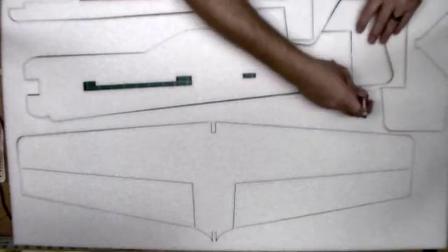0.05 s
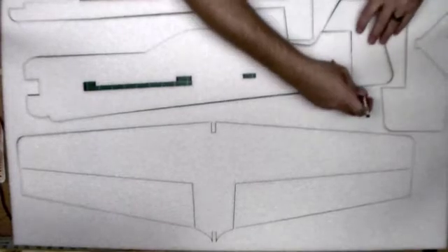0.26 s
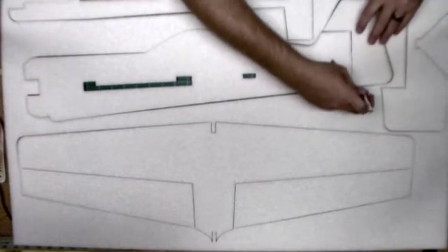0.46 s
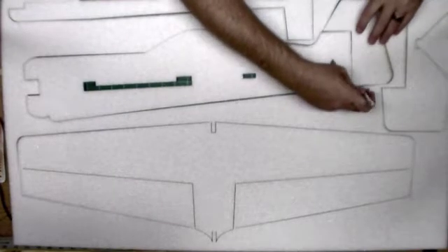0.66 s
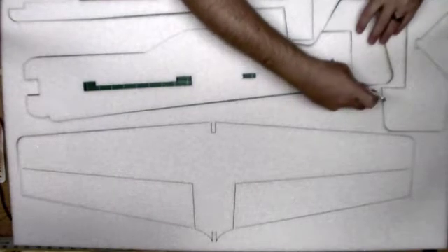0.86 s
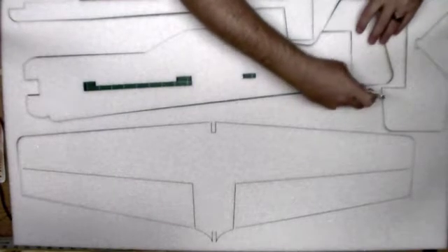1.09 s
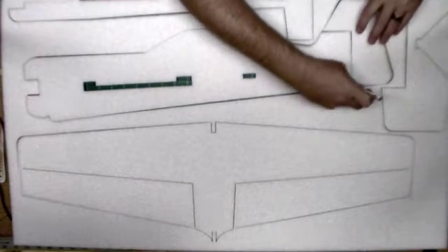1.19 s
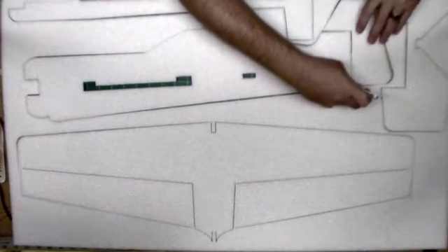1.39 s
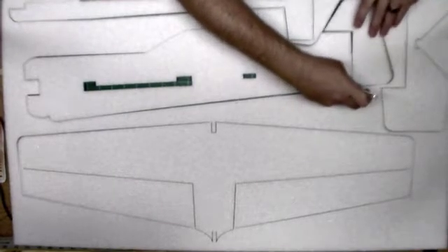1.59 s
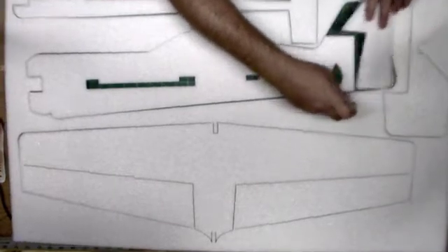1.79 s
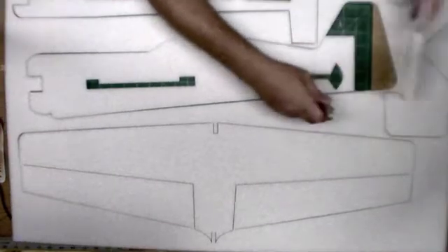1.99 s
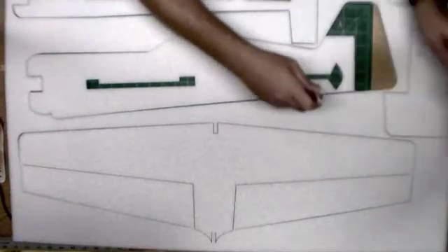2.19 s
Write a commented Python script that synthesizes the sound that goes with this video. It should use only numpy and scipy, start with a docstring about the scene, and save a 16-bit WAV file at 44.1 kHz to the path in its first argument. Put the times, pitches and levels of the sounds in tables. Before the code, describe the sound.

Foam being cut and pulled apart close to the microphone on a worktable. Short scratchy strokes and brittle ticks start near 0.2 s, with the loudest snap at 0.42 s and a crackle of clicks around 0.7-0.85 s. Fainter scratches follow until 1.45 s. A rough scrape with bunched snaps runs 1.5-1.9 s, then soft airy slides to 2.25 s. Steady hiss and faint fan hum in a small, dry room.

```python
"""Microphone hiss, room rumble and a faint fan (filtered noise) run throughout; foam squeaks are swelling sines.
A hobby knife works through a foam sheet on a worktable: short scratchy strokes of grainy noise, with snaps
as foam tabs break (ringing bursts that knock the sheet's modes). Then a cut piece is pulled free with a long
scrape, more snaps, and is slid aside. The small microphone housing rings near 3.4 kHz after snaps and knife."""
import sys
import numpy as np
from scipy import signal
from scipy.fft import rfft, irfft, next_fast_len
from scipy.io import wavfile

SR = 44100
rng = np.random.default_rng(int(sys.argv[2]) if len(sys.argv) > 2 else 0)


def to_wav(sig):
    """Store sig (one row per channel, or 1-D mono) as 16-bit WAV at the path in sys.argv[1].

    Samples outside -1..1 are clipped; the rate is SR.
    """
    pcm = np.clip(np.atleast_2d(sig), -1, 1) * 32767
    pcm = np.round(pcm).astype(np.int16)
    wavfile.write(sys.argv[1], SR, pcm.T)  # frames by channels


N = 99225

# foam tabs snap: start_s, peak_db, pitch_hz, treble_db (rustle re peak), bass_db (sheet knock re peak)
SNAPS = [(0.18, -33.5, 3270, -11.5, -43), (0.1904, -42, 3460, -27, -31), (0.1935, -39, 3490, -7, -22),
         (0.2033, -26.5, 3415, -14, -34), (0.2123, -53.5, 3700, 5, -17), (0.2174, -45, 3320, -16, -30),
         (0.3231, -48, 1950, -14, -23), (0.417, -14, 3416, -24, -14.5), (0.4209, -31, 3300, -10, -23),
         (0.4279, -37, 3660, -27, -11), (0.4444, -38, 3170, -22, -13), (0.4617, -49, 3350, -22, -4),
         (0.5422, -42.5, 3360, -26, -30), (0.5507, -41, 3240, -30, -18.5), (0.6831, -40, 3760, -10.5, -24),
         (0.7076, -35.5, 3370, -34, -32), (0.7159, -34, 3540, -27, -37), (0.7279, -37, 3030, -22, -21),
         (0.7355, -28.5, 3500, -33, -27.5), (0.7435, -47, 3270, -20, -20), (0.7565, -50, 3600, -14, -20),
         (0.77, -25.5, 3540, -16.5, -26), (0.7905, -55, 3650, -18, -26), (0.7974, -49, 3330, -18, -24),
         (0.8077, -44, 3460, -21, -25), (0.836, -45, 3480, -16, -31), (0.947, -43.5, 3340, -15, -14),
         (0.9725, -46, 3470, -2, -12.5), (1.1017, -53, 3870, -4, -13), (1.5422, -38, 3360, -16, -36),
         (1.5575, -25, 3370, -15, -14.5), (1.5692, -33, 3760, -23, -29), (1.5767, -39.5, 3060, -15, -10),
         (1.619, -29.5, 2870, -23, -17.5), (1.6206, -23.5, 3170, -33, -32), (1.7392, -31, 3120, -13, -35),
         (1.7563, -21.5, 2600, -24, -37), (1.7634, -36, 2420, -15, -11), (1.7683, -30, 3470, -21, -9),
         (1.8192, -29.5, 3980, -13, -15), (1.8284, -27, 2830, -16, -15)]
HOUSING_HZ = 3420


def amp(db):
    """Decibels to amplitude."""
    return 10 ** (np.asarray(db) / 20)


def rms_one(x):
    """Scale to rms 1."""
    return x / np.sqrt(np.mean(x ** 2) + 1e-30)


def at_hz(points, hz):
    """Read a (frequency, value) curve on a log frequency axis."""
    points_hz, values = np.array(points).T
    return np.interp(np.log(hz), np.log(points_hz), values)


def drift(rate_hz):
    """Slow chance of rms 1: noise through a two-pole low-pass."""
    warmup = 9000
    r = np.exp(-2 * np.pi * rate_hz / SR)
    slow = signal.lfilter([1], [1, -2 * r, r * r], rng.standard_normal(N + warmup))
    return rms_one(slow[warmup:])


def ring(clicks, hz, t60_s):
    """Two-pole resonator: a unit click starts a decaying sine of height 1."""
    r, w = amp(-60 / (t60_s * SR)), 2 * np.pi * hz / SR
    return signal.lfilter([0, np.sin(w)], [1, -2 * r * np.cos(w), r * r], clicks + 1e-18)


def colour(sources, envelopes, spectrum, likeness):
    """Third-octave stereo bands in five zones (thud, bass, low middle, upper middle, treble).

    Each zone has rms 1 before its envelope; without envelopes the sum has rms 1."""
    # zone limits: edge_hz
    zone_edges_hz = [250, 800, 2000, 4800]
    edges_hz = 25 * 2 ** np.arange(0, 9.5, 1 / 3)
    zones = np.zeros((5, 2, N))
    for k, (low_hz, high_hz) in enumerate(zip(edges_hz, edges_hz[1:])):
        hz = np.sqrt(low_hz * high_hz)
        zone = np.searchsorted(zone_edges_hz, hz)
        band = signal.butter(2, [low_hz, high_hz], "band", fs=SR, output="sos")
        # second source feeds the treble; neighbouring bands use separate noise
        mid, side = signal.sosfilt(band, sources[zone // 4][k % 2])
        alike = np.clip(at_hz(likeness, hz), -1, 1)
        stereo = np.sqrt(1 + alike) * mid + np.sqrt(1 - alike) * side * [[1], [-1]]
        zones[zone] += amp(at_hz(spectrum, hz)) * stereo
    if envelopes is None:
        return rms_one(zones.sum(axis=0))
    return sum(e * rms_one(z) for e, z in zip(envelopes, zones))


def background():
    """Microphone hiss and room rumble, with narrow noisy tones of a fan and electronics."""
    floor_db = -64.5
    # noise floor spectrum: hz, relative density_db_per_hz
    floor_spectrum = [(25, -34), (60, -17), (125, -11), (260, -22.5), (380, -8.5), (520, -11), (720, -16),
                      (1100, -16), (2000, -16.5), (3300, -18.5), (5000, -22), (11000, -22), (16000, -23.5)]
    # floor stereo: hz, left-right likeness (-1..1)
    floor_likeness = [(60, 0.6), (240, 0.96), (950, 0.0035), (3770, 0.12), (15000, 0.16)]
    # fan and electronics: pitch_hz, width_hz (about 6 dB down), level_db
    fan_tones = [(125, 55, -77), (366.5, 38, -74.5), (425, 29, -80.5), (500.4, 30, -71), (1648, 32, -81),
                 (15734, 33, -92)]
    noise = rng.standard_normal((2, 2, N))
    out = amp(floor_db) * colour([noise, noise], None, floor_spectrum, floor_likeness)
    for hz, width_hz, db in fan_tones:
        mid, side = ring(rng.standard_normal((2, N)), hz, 4.1 / width_hz)
        out += amp(db) * rms_one(mid + 0.71 * side * [[1], [-1]])
    return out


def squeaks():
    """Faint squeaks of foam on foam: short swelling sines."""
    # squeaks: start_s, length_s, pitch_hz, peak_db
    squeak_table = [(0.054, 0.023, 2460, -61.5), (0.995, 0.023, 2450, -58), (1.142, 0.014, 1900, -62),
                    (1.96, .01, 5250, -45.5)]
    t = np.arange(N) / SR
    out = np.zeros(N)
    for start_s, length_s, hz, db in squeak_table:
        swell = np.sin(np.pi * np.clip((t - start_s) / length_s, 0, 1)) ** 2
        out += amp(db) * swell * np.sin(2 * np.pi * hz * t)
    return out


def rubbing(envelopes, spectrum, rough):
    """Foam beads tear in dense clumped grains on top of friction noise, which is smoother in the treble."""
    grains_per_s, grain_spread_db, clump_db = 2500, 4, 0.5
    grain_share, treble_grain_share = 0.45, 0.28  # at rough = 1
    # contact stereo: hz, left-right likeness (-1..1)
    contact_likeness = [(60, 0.66), (300, 0.87), (3500, 0.99), (4600, -0.14), (6000, -0.16), (15000, -0.61)]
    born = rng.random(N) < grains_per_s * amp(6 * drift(40)) / SR
    size = born * amp(grain_spread_db * np.minimum(rng.exponential(1, N), 4))
    grain = rms_one(signal.lfilter([1], [1, -.8], size))
    clump = amp(rough * clump_db * drift(90))
    white = rng.standard_normal((2, 2, N))
    shares = np.clip([rough * grain_share, rough * treble_grain_share], 0, 1)
    sources = [np.sqrt(1 - g + g * grain ** 2) * clump * white for g in shares]
    return colour(sources, envelopes, spectrum, contact_likeness)


def stroke_contact(strokes):
    """Strength by zone of strokes that rise from -20 dB, hold and fall back."""
    # against a stroke's bass level: thud_db, bass_db, low_middle_db
    low_zones_db = [-10.5, -5, -2]
    t, power = np.arange(N) / SR, np.zeros((5, N))
    for start_s, attack_s, hold_s, release_s, db, treble_db, bass_db in strokes:
        corners_s = np.cumsum([start_s, attack_s, hold_s, release_s])
        shape_db = np.interp(t, corners_s, [-20, 0, 0, -20], left=-99, right=-99)
        zone_db = np.r_[bass_db + np.array(low_zones_db), 0, treble_db]
        power += amp(2 * (db + shape_db + zone_db[:, None]))
    return np.sqrt(power)


def rustle_contact():
    """Strength by zone of the rustle after each snap: upper middle and treble die exponentially."""
    tail_s, tail_db = .005, -17  # decay time constant, level re snap peak
    treble_tail_s, treble_gain_db = 0.0025, 4.5
    t, power = np.arange(N) / SR, np.zeros((5, N))
    for start_s, db, _, treble_db, _ in SNAPS:
        begun, after_s = t > start_s, np.maximum(t - start_s, 0)
        power[3] += begun * amp(2 * (db + tail_db)) * np.exp(-2 * after_s / tail_s)
        power[4] += begun * amp(2 * (db + treble_db + treble_gain_db)) * np.exp(-2 * after_s / treble_tail_s)
    return np.sqrt(power)


def knife():
    """Knife and finger strokes and the rustle after snaps, ringing on at the housing resonance."""
    stroke_rough, rustle_rough = 1.0, 0.13  # share of full graininess
    ring_db, ring_t60_s = -19, .008
    # strokes: start_s, attack_s, hold_s, release_s, level_db, treble_db, bass_db (both re level)
    stroke_table = [(0.155, 0.022, 0.026, 0.076, -54.5, 3, -8),
                    (.295, 0.012, 0.029, 0.023, -62.5, -0.5, -13),
                    (0.388, 0.017, 0.031, 0.086, -47, -2.5, -3.5),
                    (0.523, 0.015, 0.027, 0.039, -59, -2.5, -3.5),
                    (0.663, 0.035, 0.086, 0.013, -57.5, 1, -4.5),
                    (0.774, 0.0046, 0.072, 0.02, -59.5, -2, -4.5), (0.929, 0.021, 0.01, 0.11, -55.5, 3, -6),
                    (1.087, 0.023, 0.046, 0.084, -60.5, 2.5, -7.5),
                    (1.225, 0.032, 0.043, 0.096, -65, 4.5, -4.5),
                    (1.336, .05, 0.042, 0.064, -61.5, 2, -4.5)]
    # cutting spectrum: hz, relative density_db_per_hz
    cut_spectrum = [(29, -54), (50, -13.5), (258, -23.5), (450, -7), (615, -11.5), (1330, -18.5),
                    (1910, -14.5), (2210, -13), (3410, -7), (4450, -13), (7760, -15), (10400, -15),
                    (16000, -24)]
    cutting = rubbing(stroke_contact(stroke_table), cut_spectrum, stroke_rough)
    rustle = rubbing(rustle_contact(), cut_spectrum, rustle_rough)
    contact = cutting + rustle
    return contact + amp(ring_db) * ring(np.diff(contact, prepend=0), HOUSING_HZ, ring_t60_s)


def snaps():
    """Each break is a burst ringing at its own pitch and in the housing; it knocks the modes of the sheet."""
    burst_s, snap_t60_s = .00035, .0015
    housing_db, housing_t60_s = -4, 0.0017
    sheet_db, sheet_lag_s = -3, 0.00076
    # modes of the sheet: pitch_hz, relative level_db, t60_s
    sheet_modes = [(130, -12, 0.063), (379, -1.5, .12), (539, 2.5, 0.029), (632, -0.5, 0.037),
                   (736, -2, 0.03), (1053, -5.5, 0.072), (1247, -3, 0.033), (1469, -1, 0.059),
                   (1922, -0.5, 0.033), (2420, -28, 0.0067)]
    out, size = np.zeros(N + SR), 2048
    chance = rng.standard_normal((len(SNAPS), 200))
    samples = np.arange(size)
    u = samples / (burst_s * SR)
    for (start_s, db, hz, _, _), draw in zip(SNAPS, chance):
        push = u ** 2 * np.exp(-u) * np.sin(2 * np.pi * hz * samples / SR)
        push[:150] *= 1 + 0.18 * draw[:150]
        tone = rms_one(ring(push, hz, snap_t60_s))
        tone = tone + amp(housing_db) * rms_one(ring(tone, HOUSING_HZ, housing_t60_s))
        first = int(start_s * SR)
        out[first:first + size] += amp(db) * tone / np.abs(tone).max()
    start_s, peak_db, _, _, bass_db = np.transpose(SNAPS)
    at = (start_s * SR + sheet_lag_s * SR).astype(int)
    for k, (hz, mode_db, t60_s) in enumerate(sheet_modes):
        clicks = np.zeros(N + SR)
        clicks[at] = amp(peak_db + bass_db + sheet_db + mode_db + 2 * chance[:, 150 + k])
        out += ring(clicks, hz, t60_s) * (-1) ** k  # alternate mode signs
    return out[:N]


def pull():
    """The piece is pulled free: one long scrape whose zones follow drawn level curves."""
    # pull: time_s, level_db, thud_db, bass_db, low_middle_db, treble_db (last four re level)
    pull_curve = [(1.48, -72, -20, -25, -12, 4.5), (1.52, -52, -33, -20, -14.5, -6),
                  (1.551, -40.5, -30, -17, -10, -6), (1.575, -38.5, -25, -20, -17, -4),
                  (1.6, -42.5, -22, -13, -19, -2.5), (1.63, -43.5, -28, -19, -11, -2),
                  (1.65, -45, -21, -18, -17, -1), (1.68, -40, -24.5, -14.5, -8, -1),
                  (1.71, -41.5, -28, -12, -9, -1), (1.735, -39.5, -24, -14.5, -5, -1),
                  (1.755, -36, -35, -15, -4, -0.5), (1.771, -33.5, -29, -15.5, -17, -5),
                  (1.785, -44, -22, -8, -7, 2.5), (1.805, -42.5, -20, -17, -11, -1),
                  (1.821, -36.5, -19, -15, -19, 0), (1.836, -42.5, -9.5, -1, -17, 1),
                  (1.85, -43.5, -18, -10, -7, 2), (1.875, -53, -16, -4, -6, 2),
                  (1.931, -77.5, -22, -3, -7, 8)]
    # pull spectrum: hz, relative density_db_per_hz
    rub_spectrum = [(29, -52), (50, -20), (114, -4.5), (284, -17.5), (389, 0.5), (428, -4.5), (746, -10),
                    (1150, -3), (1740, -6), (1870, -2.5), (3180, -6), (3950, 1.5), (4670, -18.5),
                    (12300, -21), (16000, -34)]
    t = np.arange(N) / SR
    time_s, db, thud_db, bass_db, low_db, treble_db = np.transpose(pull_curve)
    envelopes = [amp(np.interp(t, time_s, db + rel_db, left=-99, right=-99))
                 for rel_db in (thud_db, bass_db, low_db, 0, treble_db)]
    return rubbing(envelopes, rub_spectrum, rough=.8)


def slides():
    """The loose piece slides over the sheet: strokes of smoother friction noise."""
    # slides: start_s, attack_s, hold_s, release_s, level_db, treble_db, bass_db (both re level)
    slide_table = [(1.9, 0.029, 0.044, 0.033, -67.5, 5, 1), (1.95, 0.016, .015, 0.073, -48.5, 5, -9),
                   (2.03, 0.011, 0.015, .03, -57.5, 2.5, -8.5),
                   (2.055, 0.02, 0.033, 0.15, -56.5, 4.5, -7.5), (2.155, 0.02, 0.025, 0.057, -55, 5, -7.5)]
    # sliding spectrum: hz, relative density_db_per_hz
    slide_spectrum = [(180, -29), (300, -28), (354, -2.5), (713, -9.5), (1010, -1.5), (1360, -10),
                      (1480, -5.5), (2280, -6), (3640, 1.5), (4440, -4.5), (6520, -3.5), (12300, -5.5),
                      (16000, -17)]
    return rubbing(stroke_contact(slide_table), slide_spectrum, rough=.15)


def room(x):
    """Six feedback delays a side, duller on every round."""
    t60_s, wall_cut_hz = 0.16, 6500
    size = next_fast_len(N + SR)
    hz = np.arange(size // 2 + 1) * SR / size
    lags_s = rng.uniform(0.0083, .03, (2, 6, 1))
    loss = amp(-60 * lags_s / t60_s) / (1 + 1j * hz / wall_cut_hz)
    loop = loss * np.exp(-2j * np.pi * hz * lags_s)
    echoes = (loop / (1 - loop)).sum(axis=1)
    return irfft(rfft(x, size) * echoes, size)[:, :N]


def scene():
    """Near sounds with a slight left lag and level offset, their room sound, and the background."""
    left_db, left_lag_samples, room_db = -.5, 1, -18.5  # left_db is re right
    near = snaps() + squeaks() + knife() + pull() + slides()
    left = np.r_[np.zeros(left_lag_samples), near[0, :-left_lag_samples]]
    near = np.array([left, near[1]]) * amp([[left_db / 2], [-left_db / 2]])
    return near + amp(room_db) * room(near.mean(axis=0)) + background()


def record(dry):
    """The deepest rumble is rolled off and the top is cut steeply."""
    rumble_cut_hz, top_hz = 48, 16000 * .987
    dry = signal.sosfilt(signal.butter(2, rumble_cut_hz, "high", fs=SR, output="sos"), dry)
    return signal.sosfilt(signal.ellip(10, .5, 70, top_hz, fs=SR, output="sos"), dry)


dry = scene()
out = record(dry)
to_wav(out)
```